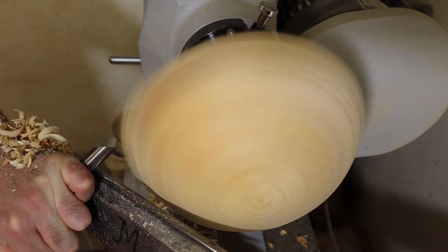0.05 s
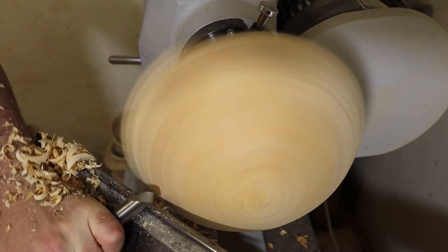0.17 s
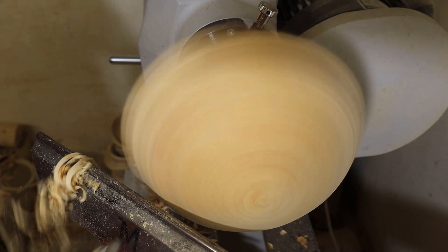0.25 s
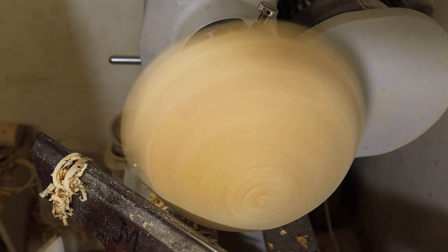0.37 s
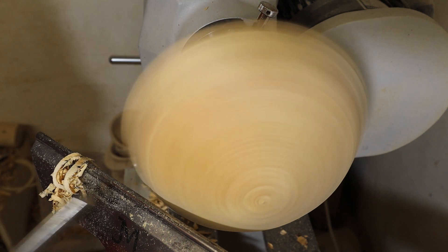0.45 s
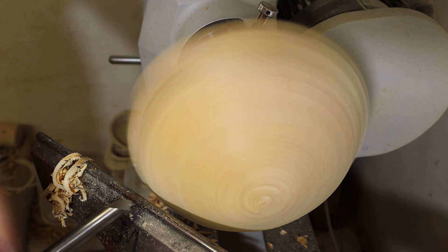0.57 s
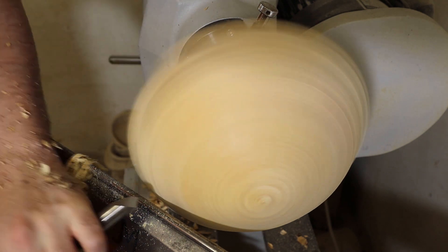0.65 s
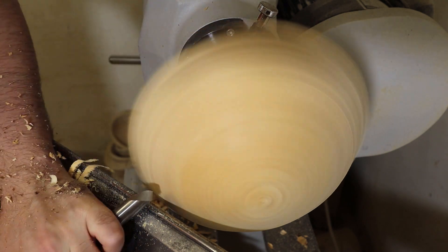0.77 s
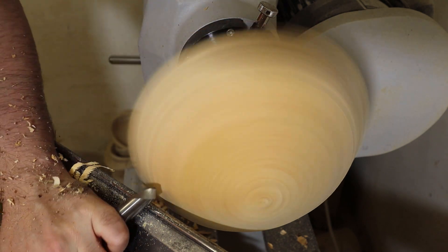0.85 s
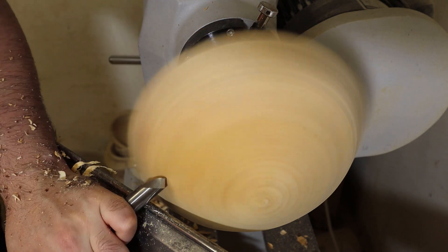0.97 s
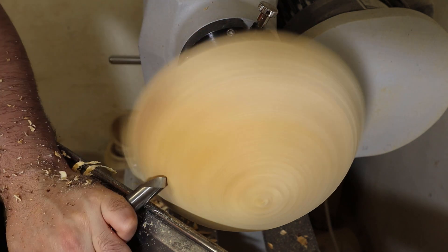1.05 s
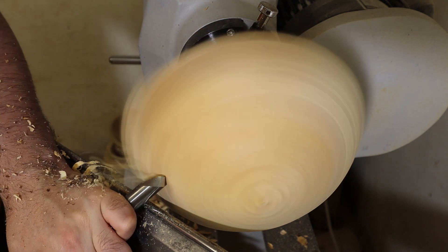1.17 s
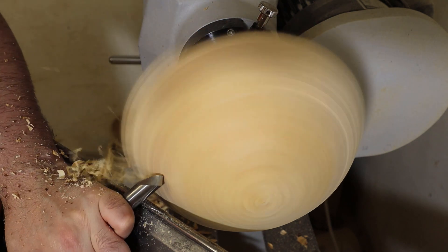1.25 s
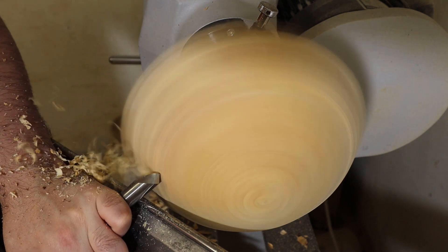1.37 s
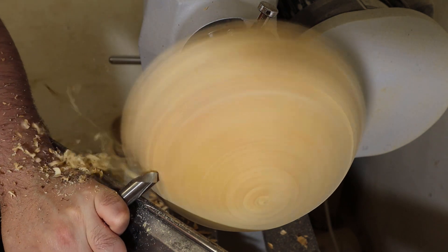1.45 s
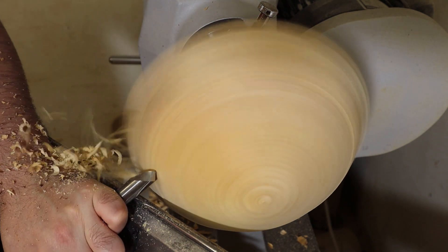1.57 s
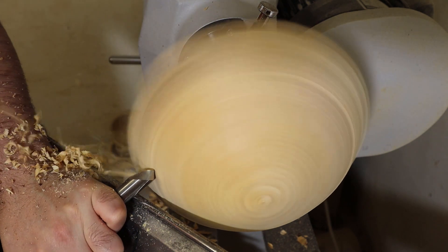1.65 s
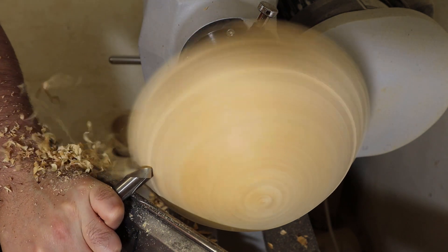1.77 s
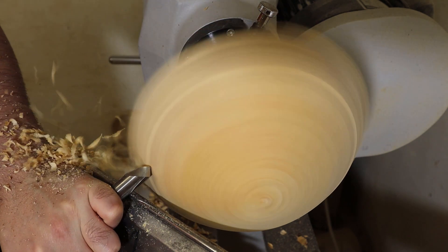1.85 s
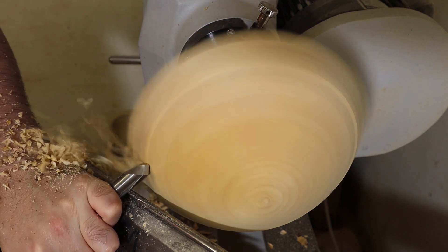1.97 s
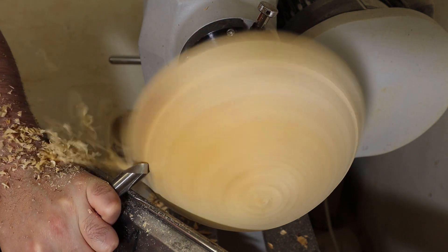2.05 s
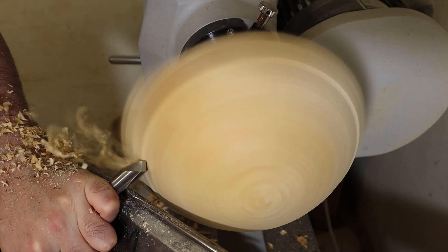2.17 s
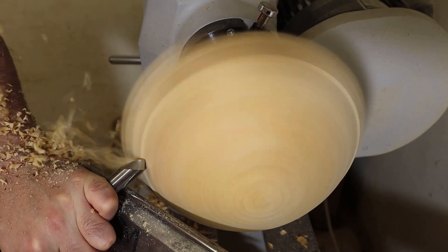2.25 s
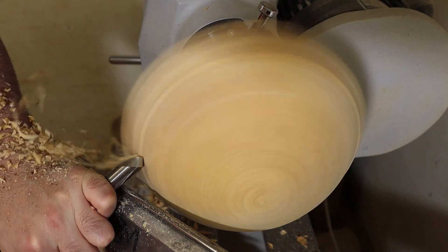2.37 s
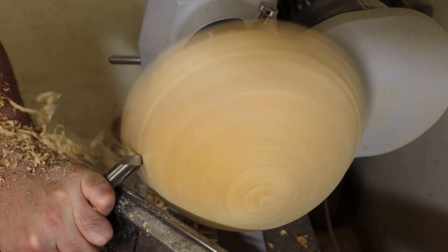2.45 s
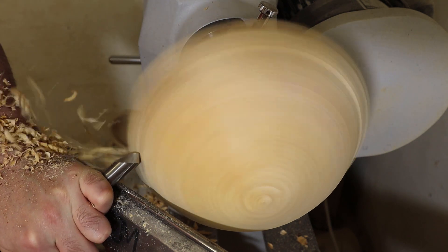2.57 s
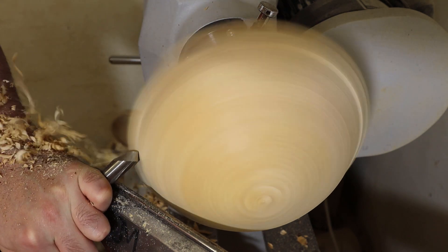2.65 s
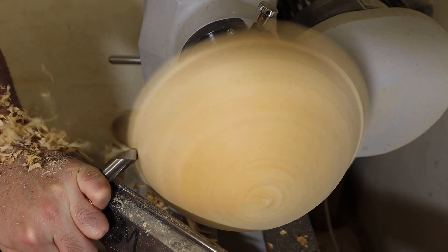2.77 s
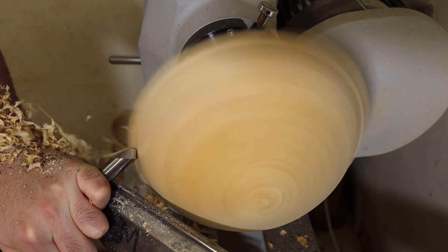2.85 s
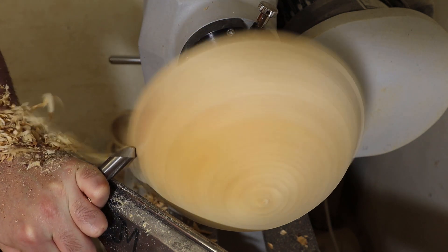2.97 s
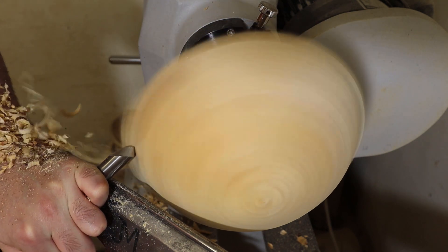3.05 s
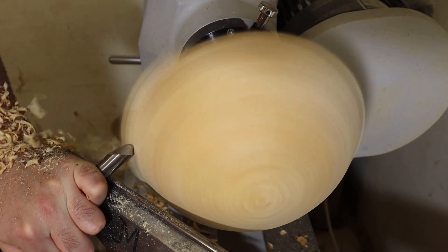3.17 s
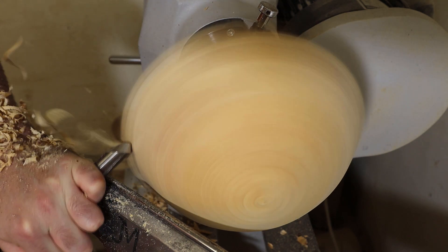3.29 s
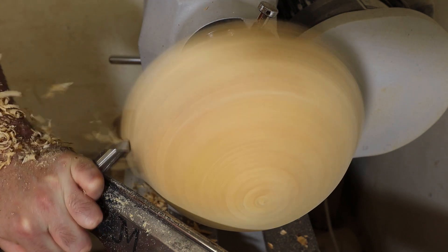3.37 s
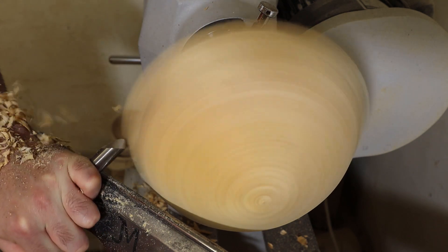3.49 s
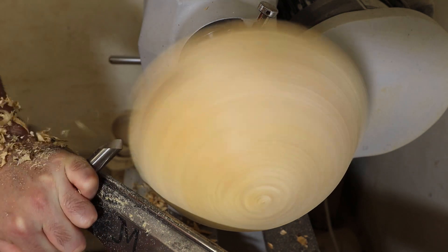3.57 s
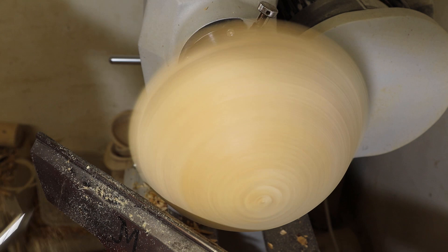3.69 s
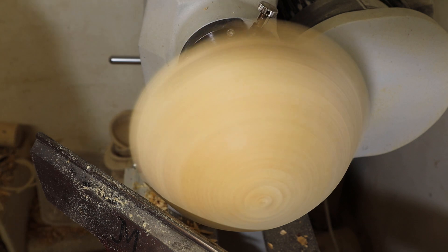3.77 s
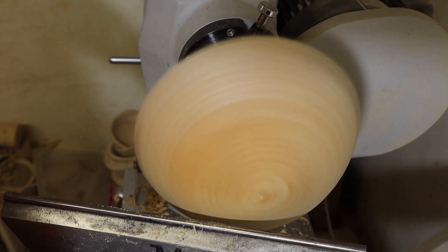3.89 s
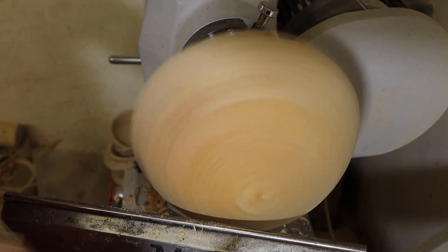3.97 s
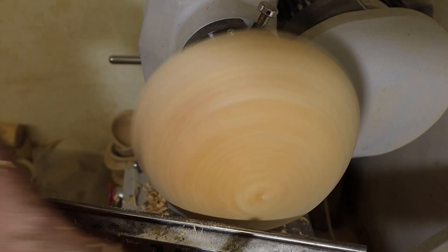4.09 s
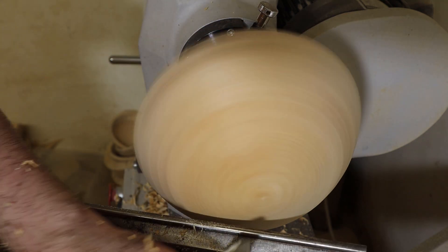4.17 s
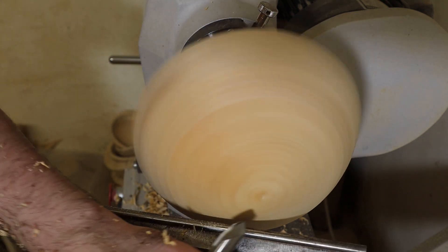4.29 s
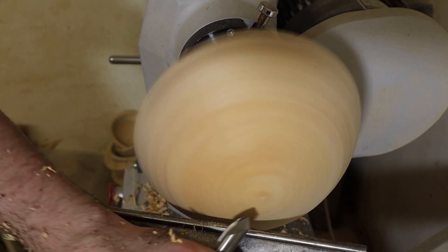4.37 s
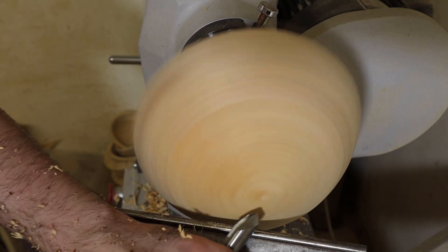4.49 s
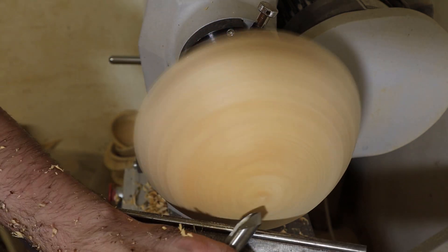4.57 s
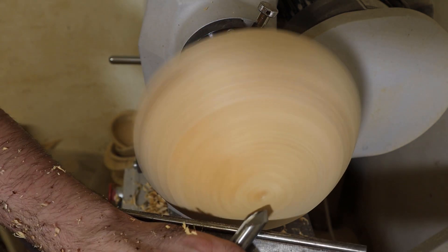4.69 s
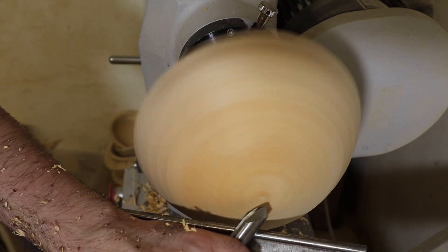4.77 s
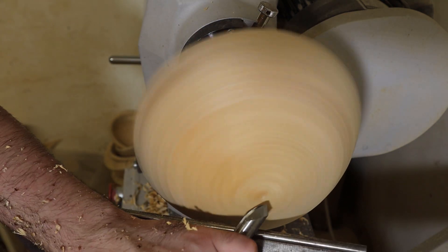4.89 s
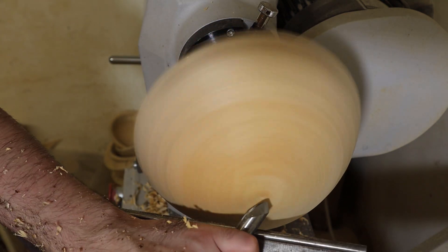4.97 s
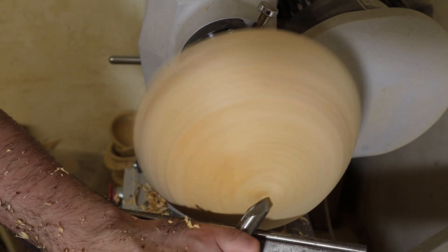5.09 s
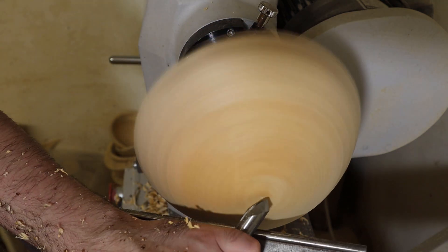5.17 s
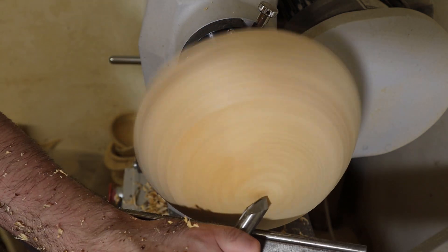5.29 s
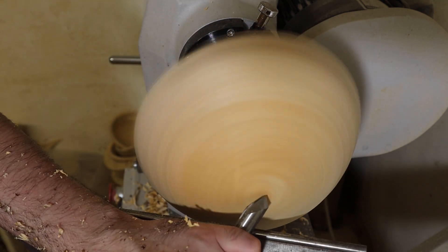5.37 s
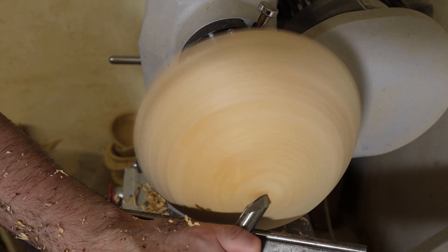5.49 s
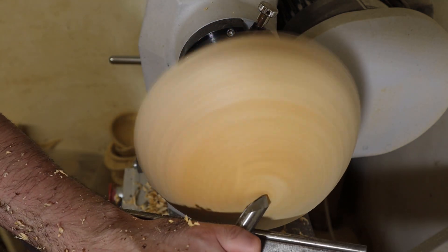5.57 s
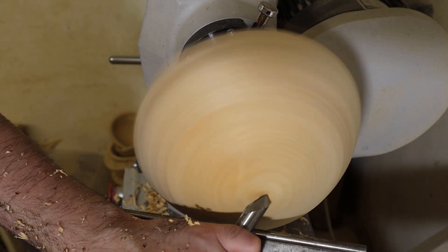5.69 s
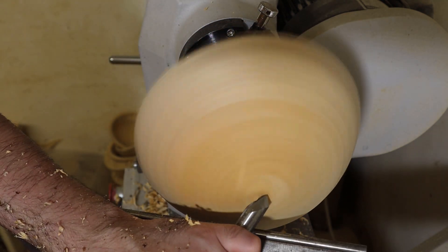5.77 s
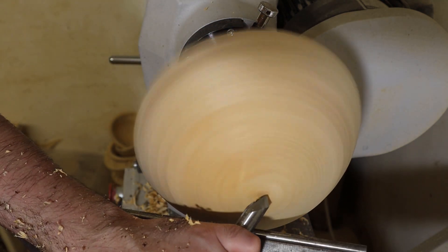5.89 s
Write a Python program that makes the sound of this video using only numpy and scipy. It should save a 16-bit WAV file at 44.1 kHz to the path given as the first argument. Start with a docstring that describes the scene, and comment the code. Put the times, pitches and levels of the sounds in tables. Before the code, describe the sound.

A wood lathe hums in a small workshop, and a gouge flicks off the spinning wood. After a second it cuts in with a chattering hiss, crackling fibres, thin squeaks and hollow drumming, ending in a quick run of sharp bites. The sound then shifts to a low motor rumble running up under a faint high whistle. The gouge knocks on the iron rest, rattles lightly and barely grazes the wood, all heard close.

```python
"""A gouge chatters into a lopsided wooden blank on a humming lathe in a small workshop.
It peels for two seconds: fibres snap and ring the steel, ridges crack, the bevel squeaks, the blank
drums. It runs off the rim, biting once a turn. Then, from a second position, the motor runs up under
the whistle of its speed drive; the gouge is set on the iron tool rest, rattles and grazes the wood."""
import sys
import numpy as np
from scipy import signal
from scipy.fft import rfft, irfft, next_fast_len
from scipy.io import wavfile
from scipy.ndimage import uniform_filter1d

SR = 44100
rng = np.random.default_rng(int(sys.argv[2]) if len(sys.argv) > 2 else 0)


def inscribe(sig):
    """Save sig as 16-bit PCM at rate SR to the path in sys.argv[1].

    A 1-D sig is mono; a 2-D sig holds one channel per row.
    Samples are clipped to [-1, 1] before scaling.
    """
    pcm = np.round(np.clip(np.atleast_2d(sig).T, -1, 1) * 32767)
    wavfile.write(sys.argv[1], SR, pcm.astype(np.int16))


N = 261954
TIME_S = np.arange(N) / SR
FFT_SIZE = next_fast_len(N + SR // 2, real=True) // 2 * 2
FREQ_HZ = np.maximum(np.arange(FFT_SIZE // 2 + 1) * SR / FFT_SIZE, 1)
LEFT_RIGHT = np.array([[1], [-1]])

TURN_HZ, BELT_HZ, LOBES = 24, 8, 4
CUT_START_S, CUT_END_S, CUT_FADE_S = 1.1077, 3.386, 0.00731
SECOND_POSITION_S, FULL_SPEED_S = 3.885, 4.39

# depth of the steady cut: time_s, hiss_db, drone_db
CUT_DEPTH = [(1.14, -49, -85.5), (1.17, -48, -65), (1.44, -40, -47.5), (1.55, -42, -54.5), (2.29, -37, -63),
             (2.84, -37, -57), (2.88, -40.5, -63.5), (3.07, -38, -57), (3.09, -39.5, -61),
             (3.34, -39, -59.5), (3.36, -39.5, -57)]
# blank's lag as the belt creeps under load: time_s, lag_turns
BELT_SLIP = [(1.7, 0.017), (2.05, -0.018), (2.35, .03), (2.7, 0.072), (3.05, 0.034), (3.35, 0.064)]
# tearing fibres: freq_hz, gain_db
FIBRE_COLOUR = [(150, -63), (600, -17.5), (1500, -14), (3000, -11), (3700, -1), (5500, -4), (6700, 2.5),
                (8300, -2.5), (10500, 0), (12000, 2), (15500, 1)]
# steel gouge resonances: centre_hz, width_hz, gain_db
GOUGE_MODES = [(2520, 37, 8.5), (2744, 75, 10), (3140, 380, -2), (3734, 130, 7), (4280, 270, 7.5),
               (4400, 67, -4), (4710, 160, 6), (5080, 220.7, 4), (7500, 250, 7), (9100, 160, 4),
               (9687, 130, -6), (10600, 210, 4.5), (11350, 170, 0)]
# hard ridges: start_s, end_s, angle_turns, decay_turns, over_cut_db
RIDGES = [(1.29, 1.7, 0.55, .035, 6.5), (1.288, 1.998, .29, 0.074, 3), (2.006, 2.817, 0.288, 0.075, 5.5),
          (2.82, 3.365, 0.33, 0.026, 5.5), (1.402, 1.977, 0.764, 0.091, 4.5), (1.986, 2.75, 0.75, 0.13, 4)]
# cracking ridge: freq_hz, gain_db
RIDGE_COLOUR = [(800, -22), (1400, -15.5), (2000, -20), (2700, -18), (3200, -25), (4300, -1), (5600, -17),
                (7500, -12), (9100, 5.5), (9700, 7.5), (10450, 10), (11800, 2), (13000, 2.5), (15500, 1)]
# stick-slip modes:
# pitch_hz, width_hz, wander_hz, level_db, loudest_s, halving_s, lobe_turns, swing_db, uneven_db
SQUEAKS = [(3795, 120, 14, -53.5, 1.94, 0.9, 0.22, -2, 1), (4197.5, 56, 11, -49.5, 2.09, 0.7, .215, 9, 1.5),
           (4288, 59, 29, -50, 2.42, 1.43, 0.19, 5, 3.5), (5110, 104, 52, -51.5, 2.6, 0.4, 0.15, 14, 5),
           (7430, 110, 22, -48.5, 1.13, -0.3, 0.945, 6, 5), (7410, 67, 48, -47.5, 2.32, 0.5, 0.956, 4.5, 4),
           (7430, 110, 50, -43, 3.25, 0.28, 0.18, 11, 4.5), (10660, 70, 280, -47.5, 2, 0.2, 0.32, 5, 1)]
# first touches, then bites near and off the rim: start_s, crack_db, tear_db, thump_db
BITES = [(1.066, -44.5, -53.5, -76), (1.087, -46.5, -61, -73), (3.297, -35, -43, -69),
         (3.359, -29, -58, -63), (3.3909, -27, -29, -51.5), (3.431, -25, -32, -52.5),
         (3.4733, -24, -33, -53.5), (3.5151, -23.5, -33, -50.5), (3.558, -22, -33, -49),
         (3.6, -29, -38, -51)]
# chip breaking off whole: freq_hz, gain_db
CHIP_COLOUR = [(150, -38), (700, -40.5), (2000, -26), (3100, -14), (4150, 0.5), (5600, -2.5), (7500, 5.5),
               (8400, -6), (10500, 7), (11900, 2), (12800, 6.5), (14000, 0.5), (15500, -1.5)]
# edge catching on a ridge: start_s, level_db
SNAGS = [(1.3036, -39.5), (1.511, -34), (1.636, -47), (1.761, -30), (1.801, -29), (2.009, -32),
         (2.221, -32), (2.24, -29), (2.348, -34), (2.7218, -30.5), (2.764, -35), (2.803, -39),
         (3.0137, -29.5), (3.0546, -32), (3.097, -33)]
# stereo tilt of the cut: freq_hz, left_over_right_db
EDGE_BALANCE = [(9600, 0), (10700, -3), (12500, 3.5), (15500, 2.5)]

# one side of the blank drumming harder: start_s, end_s, angle_turns, swing_db
DRONE_SWING = [(1.274, 1.755, 0.72, 7.5), (1.825, 3.199, 0.48, 2.5)]
# blank's body: freq_hz, gain_db
BLANK_COLOUR = [(30, -32), (110, -23.5), (190, -15.5), (290, -9.5), (400, -15.5), (600, -5), (930, 0),
                (1150, -4.5), (1500, -8), (2500, -0.5), (5000, -20.5)]
# blank's resonances: centre_hz, width_hz, gain_db
BLANK_MODES = [(462, 63, 10.5), (610, 23, 5.5), (824, 103, 13), (1200, 120, -6.5), (1358, 154, 15),
               (2030, 950, -1)]
# course of the end-grain knock: time_s, level_db, angle_turns
END_GRAIN = [(1.25, -61.5, .62), (1.36, -53.5, .62), (1.45, -47, .62), (1.56, -77, .61), (1.741, -47.5, .6),
             (1.841, -66, .48), (2.03, -55, .48), (2.3, -57.5, .46), (2.47, -55.5, .45), (2.78, -57.5, .47),
             (2.95, -55.5, .47), (3.03, -44, .46), (3.1, -57, .48), (3.35, -56, 0.5167),
             (3.44, -48.5, 0.5619), (3.6, -60, .55)]
# struck blank: pitch_hz, level_db, t60_s
END_GRAIN_MODES = [(475.79, -20.5, 0.081), (620, -9, 0.045), (793.7, 2.5, 0.081), (841, 0.5, 0.037),
                   (1030, -24, 0.038), (1140, -11.5, 0.07), (1450, -11, 0.026)]

# edge flicking the wood as it lifts off: start_s, level_db, decay_s
FLICKS = [(.0205, -22.5, 0.0025), (.027, -36.5, 0.012), (.062, -53, 0.0027)]
# flick spectrum: freq_hz, gain_db
FLICK_COLOUR = [(120, -27.5), (200, -25), (730, -3.5), (1210, -13), (1910, -15), (2700, -9), (3430, -14),
                (3690, -3.5), (5130, -7.5), (5630, -1), (6170, -10), (7270, 4), (8120, -8.5), (12800, 0),
                (16000, -15)]
# flick resonances: centre_hz, width_hz, gain_db
FLICK_MODES = [(5500, 370, 5), (7400, 378.3, 5)]
# shavings sliding off the hand: start_s, level_db, decay_s
SHAVINGS = [(.147, -66, .025), (.189, -62, 0.0065), (.352, -62.5, 0.0085), (.54, -67, 0.054),
            (.669, -63.5, .013)]
# their rustle: freq_hz, gain_db
SHAVING_COLOUR = [(500, -12), (2500, -0.5), (5000, 2), (9000, -1.5), (15000, -6)]
# gouge tapping the rest: start_s, level_db, decay_s
TAPS = [(.8485, -43, 0.0037), (.8525, -43.5, 0.005)]
# tap spectrum: freq_hz, gain_db
TAP_COLOUR = [(290, -45), (500, -16), (708, -32.5), (974, -14), (1210, -20.5), (1690, -12), (2260, -15),
              (2730, -4.5), (4400, -12), (6060, 0.5), (7530, -8), (9630, 4.5), (10700, -14), (14900, -8),
              (16000, -40)]
# gouge knocking on the rest: start_s, level_db, decay_s
REST_KNOCKS = [(3.94, -68.5, 0.025), (4.7315, -40, 0.0028), (4.7365, -43, 0.00361)]
# knock spectrum: freq_hz, gain_db
REST_COLOUR = [(350, -43), (600, -11), (703, -15), (915, -14), (990, -5), (1410, -11), (1530, 1),
               (1960, -2), (3120, -10), (4750, -9), (5400, -19), (7150, -16), (10200, -18.5), (14000, -43)]
# broad resonances of the rest: centre_hz, width_hz, gain_db
REST_PEAKS = [(1050.3, 250, 5), (2020, 290, 8), (2770, 430, 6.5), (3950, 1400, 8.5)]
# ringing iron: pitch_hz, level_db, t60_s
REST_MODES = [(996.4, -3, 0.24), (1111, -4.5, 0.25), (1965.1, 0, 0.13), (2214, -16.5, 0.11),
              (2330, -14, 0.57), (2490, -5, 0.214), (2800, -9, 0.2), (3750, -19, 0.34), (4100, -19.5, 0.25),
              (4686, -11, 0.11), (5458, -28, 0.15), (7936, -30.5, 0.33)]
# gouge rattling on the rest: freq_hz, gain_db
RATTLE_COLOUR = [(900, -27), (1290, 2), (1450, 15), (1560, -8), (1700, 6), (2050, -16), (2370, -11),
                 (2600, -24), (2850, -16), (4000, -38)]
# edge barely touching the wood: start_s, level_db, decay_s
GRAZES = [(5.235, -75, .02), (5.69, -72, .015), (5.732, -71, .014), (5.765, -71, .01), (5.793, -66, 0.015),
          (5.84, -70, .012), (5.893, -66.5, 0.015), (5.925, -75, .01)]
# graze spectrum: freq_hz, gain_db
GRAZE_COLOUR = [(800, -11), (1600, 3), (2500, -7), (3400, -1), (4500, -1), (5500, -10), (9000, -20),
                (14000, -40)]

# bearing noise, first position: freq_hz, gain_db
IDLE_COLOUR = [(24, -90), (40, -58), (99, -24.5), (209, -15.5), (290, -8), (412, -14.5), (444, -10.5),
               (630, -14), (715, -23), (965, -6), (1440, -17), (1720, -12.5), (2840, -24.5), (3830, -19.5),
               (16000, -36.5)]
# its resonances: centre_hz, width_hz, gain_db
IDLE_MODES = [(277.5, 18, 11), (950, 130, 2.5), (1220, 117.86, -13.5), (1810, 180, -1.5),
              (3895.3, 420, 5.5), (7100, 440, 6.5), (8300, 220, 6)]
# its stereo width: freq_hz, side_over_mid_db
IDLE_WIDTH = [(60, -9.5), (110, -19), (200, -21), (380, -16.5), (700, -7.5), (1290, -6), (2380, -4.5),
              (4400, -3), (8120, 3.5), (15000, 8)]
# motor, first position: pitch_hz, level_db
IDLE_TONES = [(301.5, -74.5), (463.0, -84.5), (613.7, -79.5), (877.5, -88), (925.9, -80), (952.8, -78.5),
              (985.1, -98), (1017, -90), (1082, -95), (1707, -74.5), (1846, -94.5), (3768, -83)]
# belt whirr: freq_hz, gain_db
BELT_COLOUR = [(600, -41.5), (780, -5.5), (870, -11), (950, -1.5), (1020, -8), (1120, -28), (1250, -33)]
# lathe rumble, second position: freq_hz, gain_db
RUMBLE_COLOUR = [(18, -49), (30, -32.5), (70, -2.5), (172, -14), (328, -7.5), (424, -17.5), (691, -15),
                 (806, -28), (1280, -23), (2140, -29), (2370, -30), (2560, -28.5), (7950, -49),
                 (10000, -38), (14000, -75)]
# its resonances: centre_hz, width_hz, gain_db
RUMBLE_MODES = [(43.96, 26, -3), (90.72, 42, 4), (289.84, 46, 6.5), (413, 63, -3.5), (644, 120, 1.5),
                (820, 230, 5.5), (1288, 110, 11), (1474, 72, 9.5), (1710, 100, 9), (2350, 87, 12.5),
                (2830, 70.3, 11.5)]
# its stereo width: freq_hz, side_over_mid_db
RUMBLE_WIDTH = [(60, -36), (110, -18.5), (200, -21), (380, -12), (700, -6.5), (1290, -5), (2380, 0),
                (4400, 7), (8120, 14), (15000, 24)]
# motor at full speed, second position: pitch_hz, level_db, left_over_right_db
RUN_TONES = [(66, -82, 1), (83.3, -77, 0), (205, -76.5, 3.5), (276, -100, -1), (334.5, -62.5, -2.5),
             (660, -86.5, -20), (702, -65, 5.5), (729, -79, -1)]
# drive's switching whistle: pitch_hz, level_db
DRIVE_TONES = [(9496, -85.5), (9884, -74.5), (9959, -84.5), (10040, -86), (10115, -81), (10584, -101)]
# drive's hiss: freq_hz, gain_db
DRIVE_COLOUR = [(8000, -32.5), (9400, -26), (9950, -23.5), (10500, -22.5), (11500, -35.5), (14000, -51)]
# stereo width of the reflections: freq_hz, side_over_mid_db
ROOM_WIDTH = [(100, 5.5), (700, -8), (1400, -4), (3000, 1), (8000, -4), (15000, -37)]


def gouge():
    """A steady shaving, then one chip a turn, over the drumming of the blank."""
    _, hiss_db, drone_db = curve(CUT_DEPTH)
    breaks, thumps = bites()
    chips = through(breaks * fractures(spread_db=-0.5, apart=0.4), body(CHIP_COLOUR))
    edge = peeling(hiss_db) + chips * from_db(0.61 * LEFT_RIGHT) + snags()
    edge = through(edge, from_db(LEFT_RIGHT * spectrum_db(EDGE_BALANCE) / 2))
    edge = workshop(edge, lag_ms=0.027, near_db=-9.5, room_db=-11)
    blank = drumming(drone_db, thumps) + end_grain_knocks()
    return edge + workshop(blank, lag_ms=0.02, near_db=-10.5, room_db=-4)


def peeling(hiss_db):
    """Fibres snap at the edge and ring the steel; ridges crack and the bevel squeaks over them."""
    pressure = edge_pressure()
    force = pressure * from_db(hiss_db + 1.8)
    # coarse grain repeats from turn to turn; the finest tearing is always new
    coarse_band = np.sqrt(lowpass(5500, 8))
    grain = each_turn(grains(spread_db=2.5), memory=0.54)
    grain = grain + from_db(-3.5) * fractures(spread_db=1, apart=0.93)
    coarse = through(force * from_db(-4 + 2.46 * drift(110)) * grain, coarse_band)
    fine = through(force * fractures(spread_db=5, apart=0.24), np.sqrt(1 - coarse_band ** 2))
    fibres = through(coarse + fine, body(FIBRE_COLOUR, GOUGE_MODES))
    bevel_pressure = pressure * from_db(0.2302 * (hiss_db - hiss_db.max()))
    return fibres + ridge_cracks(hiss_db) + squeaks(bevel_pressure)


def edge_pressure(shallow_s=0.2, entry_s=0.04687, hollow_growth_s=0.066):
    """Uneven grain, lobes, wobble and a hollow vary the load as the edge eases in and cuts."""
    since_s = np.maximum(TIME_S - CUT_START_S, 0)
    remaining_s = np.maximum(CUT_END_S - TIME_S, 0)
    grain_db = 0.85 * each_turn(drift(200), memory=0.91) + 1.2 * drift(100)
    # the bevel rides the lobes, fluttering most where the cut is shallow
    shallow = np.exp(-since_s / shallow_s) + np.exp(-remaining_s / shallow_s)
    flutter_db = (2 + 2 * shallow) * turn_wave(0.15, per_turn=LOBES)
    wobble_db = 0.55 * turn_wave(0.25)   # the off-centre blank leans into the edge
    # the hollow drops away once a turn, deeper towards the rim
    hollow = passing(angle_turns=-0.05, width_turns=0.096)
    hollow_db = -18 * np.exp(-remaining_s / hollow_growth_s) * hollow
    entry = between(CUT_START_S, CUT_END_S, CUT_FADE_S) * from_db(-5.5 * np.exp(-since_s / entry_s))
    return entry * evened(from_db(grain_db + flutter_db + wobble_db + hollow_db))


def ridge_cracks(hiss_db, rise_turns=0.024):
    """Each ridge hits the edge suddenly and crumbles behind it, with a new strength every turn."""
    hits, turns = np.zeros(N), blank_turns()
    for start_s, end_s, angle_turns, decay_turns, over_cut_db in RIDGES:
        past_turns = (turns - angle_turns + 0.251) % 1 - 0.25
        rise = np.exp(-0.5 * (np.minimum(past_turns, 0) / rise_turns) ** 2)
        crumble = np.exp(-np.maximum(past_turns, 0) / decay_turns)
        hits += from_db(over_cut_db) * between(start_s, end_s, 0.05) * rise * crumble
    force = hits * from_db(hiss_db + 2.5 * drift(48))
    return through(force * fractures(spread_db=6.5, apart=0.79), body(RIDGE_COLOUR))


def squeaks(pressure):
    """The rubbing bevel sets wandering modes singing, in short flares as the lobes pass."""
    out = np.zeros(N)
    for hz, width_hz, wander_hz, db, loudest_s, halving_s, lobe_turns, swing_db, uneven_db in SQUEAKS:
        lobes_db = swing_db * turn_wave(lobe_turns, per_turn=LOBES)
        lobes_db += uneven_db * (0.44 * turn_wave(lobe_turns) + turn_wave(lobe_turns, per_turn=2))
        # the bevel either sticks or slips, so flares have a ceiling
        slip_db = 6.1 * np.tanh(each_turn(drift(260), memory=0.46) - 0.4)
        flare = evened(from_db(slip_db + lobes_db))
        # each mode swells and fades as the gouge swings round
        swell = from_db(db) * 0.5 ** (((TIME_S - loudest_s) / halving_s) ** 2)
        rub = pressure * swell * flare * each_turn(rng.standard_normal(N), memory=0.26)
        pitch_hz = hz + wander_hz * each_turn(drift(70), memory=0.6056)
        out += resonator(rub, pitch_hz, width_hz)
    return out


def bites(tear_after_s=0.009):
    """Break and thump envelopes: each bite cracks, then its chip tears free; both push the blank."""
    cracks = bursts([(s, db, 0.004) for s, db, _, _ in BITES], rise_s=0.0024)
    tears = bursts([(s + tear_after_s, db, 0.0046) for s, _, db, _ in BITES], rise_s=0.0043)
    pushes = [(s + delay_s, db, 0.0071) for s, _, _, db in BITES for delay_s in (0, tear_after_s)]
    return cracks + tears, bursts(pushes, rise_s=0.0043)


def snags(ping_hz=10400):
    """The edge catches on a ridge: a crack and a short ping of the steel."""
    catches = bursts([(s, db, 0.0036) for s, db in SNAGS], rise_s=0.00098)
    ping = tone(ping_hz, waver_db=-4, wander_hz=50.1)
    crack = from_db(-0.5) * through(grains(spread_db=4), body(CHIP_COLOUR))
    return catches * (ping + crack)


def drumming(drone_db, thumps, thud_start_s=1.25, growth_db_per_s=5):
    """The cutting force drums on the blank: a hollow drone over a deeper thud."""
    swing_db = sum(db * between(start_s, end_s, 0.1167) * turn_wave(angle_turns)
                   for start_s, end_s, angle_turns, db in DRONE_SWING)
    force = between(CUT_START_S, CUT_END_S, CUT_FADE_S) * evened(from_db(swing_db))
    drone = force * from_db(drone_db - 0.2) + thumps
    # the thud grows towards the rim and partly follows the drone
    thud_db = -59.5 + growth_db_per_s * (TIME_S - thud_start_s) + 0.71 * (drone_db - np.median(drone_db))
    thud = force * between(thud_start_s, CUT_END_S, 0.1) * from_db(thud_db) + from_db(4) * thumps
    grain = each_turn(grains(spread_db=2.5), memory=0.63)
    blank = body(BLANK_COLOUR, BLANK_MODES)
    deep = lowpass(560, 6)
    return (through(drone * grain, blank * (1 - deep))
            + through(thud * grain, blank * deep * highpass(110, 4)))


def end_grain_knocks(rise_s=0.0023):
    """Once a turn the end grain strikes the edge; the blank rings like a wood block."""
    time_s, level_db, angle_turns = np.transpose(END_GRAIN)
    out, age_s = np.zeros(N), TIME_S[:SR // 6]
    attack = np.minimum(age_s / rise_s, 1)
    for turn in np.arange(np.ceil(time_s[0] * TURN_HZ), time_s[-1] * TURN_HZ):
        strike_turns = np.interp(turn / TURN_HZ, time_s, angle_turns) + rng.normal(0, 0.012)
        start_s = (turn + strike_turns) / TURN_HZ
        modes = [(hz, db + rng.normal(0, 2), t60_s) for hz, db, t60_s in END_GRAIN_MODES]
        strength = from_db(np.interp(start_s, time_s, level_db))
        out[int(start_s * SR):][:len(age_s)] += strength * attack * ringing(modes, age_s)
    return out


def handling():
    """The edge flicks off the wood, shavings slide off the hand, the gouge taps the rest."""
    flick = bursts(FLICKS, rise_s=0.00074) * fractures(spread_db=1.5, apart=0.2)
    tap = bursts(TAPS, rise_s=0.00065) * fractures(spread_db=-2, apart=0.5365)
    rustle = bursts(SHAVINGS, rise_s=0.0057) * fractures(spread_db=8, apart=0.48)
    return (through(flick, body(FLICK_COLOUR, FLICK_MODES))
            + through(tap, body(TAP_COLOUR))
            + through(rustle, body(SHAVING_COLOUR)))


def rest_knocks():
    """The gouge knocks on the iron rest; the second knock sets it ringing."""
    knocks = bursts(REST_KNOCKS, rise_s=0.00034) * fractures(spread_db=-4, apart=0.53)
    age_s = np.maximum(TIME_S - REST_KNOCKS[1][0], 0)
    return through(knocks, body(REST_COLOUR, REST_PEAKS)) + from_db(-58.5) * ringing(REST_MODES, age_s)


def rattle(start_s=4.93):
    """The gouge rattles lightly on the rest, shaken twice a turn."""
    shake_db = 10 * turn_wave(0.062, per_turn=2) - 2 * np.tanh(drift(45))
    shake = from_db(-78.5) * between(start_s, 7, 0.2) * unit_rms(from_db(shake_db))
    return through(shake * fractures(spread_db=4, apart=0.45), body(RATTLE_COLOUR))


def grazes():
    """The edge barely touches the spinning wood."""
    touches = bursts(GRAZES, rise_s=0.006) * fractures(spread_db=-3, apart=0.65)
    return through(touches, body(GRAZE_COLOUR))


def idle_lathe(joint_s=0.1113):
    """Bearing noise, plus a belt whirr and motor tones that pulse with each lap of the belt."""
    lap = np.cos(2 * np.pi * (TIME_S - joint_s) * BELT_HZ)
    noise = bearings() + belt_whirr(lap, joint_s)
    motor = sum(tone(hz, waver_db=0.1, wander_hz=1.24) * from_db(db - 2.5) for hz, db in IDLE_TONES)
    return noise + from_db(0.55 * lap) * motor


def bearings(throb_dip_s=0.091):
    """Bearing noise repeats with the spindle; its low hum throbs twice a belt lap."""
    colour = body(IDLE_COLOUR, IDLE_MODES)
    mid = through(each_turn(grains(spread_db=-2.5), memory=0.59), colour)
    side = through(each_turn(grains(spread_db=-6.5), memory=0.4), colour)
    throb = unit_rms(from_db(-np.cos(4 * np.pi * (TIME_S - throb_dip_s) * BELT_HZ)))
    mid = mid + (throb - 1) * through(mid, lowpass(421.6, 8))
    return from_db(-68) * widen(mid, side, IDLE_WIDTH)


def belt_whirr(lap, joint_s):
    """The whirr throbs twice a lap, flutters twice a turn and dips slightly as the joint passes."""
    throb_db = 2 * (2 * lap ** 2 - 1)
    flutter_db = 3 * turn_wave(joint_s * TURN_HZ, per_turn=2)
    joint_db = -0.5 * np.exp(3.1 * (lap - 1))
    whirr = through(each_turn(grains(spread_db=-3), memory=0.93), body(BELT_COLOUR))
    return from_db(-71.5 + throb_db + flutter_db + joint_db) * whirr


def motor_run_up(ramp_per_s=0.88, growth_db_per_s=1.6):
    """Rumble grows and motor tones rise as the speed ramps up."""
    speed = np.clip(1 + ramp_per_s * (TIME_S - FULL_SPEED_S), 0.1, 1)
    shaking = rng.standard_normal((2, N)) * from_db(1.7 * drift(40))
    mid, side = through(shaking, body(RUMBLE_COLOUR, RUMBLE_MODES) * np.sqrt(highpass(51.89, 8)))
    rumble = from_db(-64 + growth_db_per_s * (TIME_S - FULL_SPEED_S)) * widen(mid, side, RUMBLE_WIDTH)
    # the deepest shaking builds only near full speed
    rumble -= (1 - speed ** 3) * through(rumble, lowpass(85, 6))
    motor = sum(from_db(db + LEFT_RIGHT * pan_db / 2) * tone(hz * speed, waver_db=2.5, wander_hz=3.22)
                for hz, db, pan_db in RUN_TONES)
    return rumble + from_db(-2.5) * speed ** 4.526 * motor


def drive_whistle():
    """The speed drive whistles at its constant switching rate."""
    whistle = sum(from_db(db) * tone(hz, waver_db=0, wander_hz=1.4148) for hz, db in DRIVE_TONES)
    whistle = whistle + from_db(-80.5) * through(rng.standard_normal((2, N)), body(DRIVE_COLOUR))
    # so short a wave meets the two ears out of step
    return whistle + LEFT_RIGHT * through(whistle, 1j * from_db(3.5))


def workshop(x, lag_ms, near_db, room_db, near_t60_s=0.052, room_t60_s=0.21, wall_hz=3500):
    """Direct sound, left ear first, plus scatter off the lathe and a duller room tail."""
    near = from_db(near_db) * reflections(near_t60_s)
    tail = from_db(room_db) * reflections(room_t60_s) / (1 + 1j * FREQ_HZ / wall_hz)
    mid, side = near + tail
    direct = np.exp(1j * np.pi * FREQ_HZ * lag_ms / 1000 * LEFT_RIGHT)
    return through(x, direct + mid + LEFT_RIGHT * side * from_db(spectrum_db(ROOM_WIDTH)))


def reflections(t60_s):
    """Mid and side responses of a diffuse decay."""
    decay = rng.standard_normal((2, N)) * from_db(-60 * TIME_S / t60_s)
    return rfft(unit_rms(decay) / np.sqrt(N), FFT_SIZE)


def blank_turns():
    """Turns made so far, less belt slip."""
    _, lag_turns = curve(BELT_SLIP)
    return TIME_S * TURN_HZ - lag_turns


def turn_wave(angle_turns, per_turn=1):
    """Cosine locked to the blank, with a peak at this angle."""
    return np.cos(2 * np.pi * per_turn * (blank_turns() - angle_turns))


def passing(angle_turns, width_turns):
    """A bump each time one spot passes the edge."""
    away_turns = (blank_turns() - angle_turns + 0.5) % 1 - 0.5
    return np.exp(-0.5 * (away_turns / width_turns) ** 2)


def each_turn(x, memory):
    """What is met on one turn returns, partly renewed, on the next."""
    period = round(SR / TURN_HZ)
    turns = np.pad(x, (0, -N % period)).reshape(-1, period)
    fresh = np.sqrt(1 - memory ** 2)
    repeated, _ = signal.lfilter([fresh], [1, -memory], turns, axis=0, zi=memory * turns[-2:-1])
    return repeated.ravel()[:N]


def evened(gain):
    """Gain scaled to unit power over each turn."""
    return gain / np.sqrt(uniform_filter1d(gain ** 2, round(SR / TURN_HZ)))


def grains(spread_db):
    """Dense tiny impulses of uneven size."""
    return unit_rms(rng.standard_normal(N) * from_db(spread_db * np.minimum(drift(2500), 2)))


def fractures(spread_db, apart):
    """Grains at two ears; a share `apart` of the power comes by separate paths."""
    separate = np.array([grains(spread_db), grains(spread_db)])
    return np.sqrt(1 - apart) * grains(spread_db) + np.sqrt(apart) * separate


def bursts(contacts, rise_s):
    """Envelope of contacts that swell quickly and die away."""
    out = np.zeros(N)
    for start_s, level_db, decay_s in contacts:
        span = slice(int(start_s * SR), int(start_s * SR) + SR // 5)
        age_s = np.maximum(TIME_S[span] - start_s, 0)
        decay = np.exp(-np.maximum(age_s - rise_s, 0) / decay_s)
        out[span] += from_db(level_db) * np.minimum(age_s / rise_s, 1) * decay
    return out


def tone(hz, waver_db, wander_hz):
    """Sine wavering in level and pitch."""
    cycles = np.cumsum(hz + wander_hz * drift(12)) / SR + rng.random()
    return np.sqrt(2) * np.sin(2 * np.pi * cycles) * from_db(waver_db * drift(14))


def ringing(modes, age_s):
    """Decaying sines of a struck body."""
    return sum(from_db(db - 60 * age_s / t60_s) * np.sin(2 * np.pi * hz * age_s)
               for hz, db, t60_s in modes)


def resonator(x, pitch_hz, width_hz):
    """One driven mode of moving pitch."""
    carrier = np.exp(2j * np.pi * np.cumsum(pitch_hz) / SR)
    pole = np.exp(-np.pi * width_hz / SR)
    baseband = signal.lfilter([1], [1, -pole], x / carrier + 1e-18)
    return np.real(carrier * baseband) * np.sqrt(2 * (1 - pole ** 2))


def body(colour, modes=()):
    """Minimum-phase response of unit power: broad colour plus resonances."""
    peaks_db = sum(db / (1 + (2 * (FREQ_HZ - hz) / width_hz) ** 2) for hz, width_hz, db in modes)
    cepstrum = irfft(np.log(unit_rms(from_db(spectrum_db(colour) + peaks_db))))
    cepstrum[1:FFT_SIZE // 2] *= 2
    cepstrum[FFT_SIZE // 2 + 1:] = 0
    return np.exp(rfft(cepstrum))


def widen(mid, side, width):
    """Left and right from mid and side."""
    return mid + LEFT_RIGHT * through(side, from_db(spectrum_db(width)))


def through(x, response):
    """Filter by a frequency response."""
    return irfft(rfft(x, FFT_SIZE) * response, FFT_SIZE)[..., :N]


def lowpass(corner_hz, order):
    """Zero-phase treble roll-off."""
    return 1 / (1 + (FREQ_HZ / corner_hz) ** order)


def highpass(corner_hz, order):
    """Zero-phase bass roll-off."""
    return 1 / (1 + (corner_hz / FREQ_HZ) ** order)


def spectrum_db(points):
    """Points joined over log frequency."""
    hz, db = np.transpose(points)
    return np.interp(np.log(FREQ_HZ), np.log(hz), db)


def curve(rows):
    """Every column of a timed table, per sample."""
    columns = np.transpose(rows)
    return [np.interp(TIME_S, columns[0], column) for column in columns]


def between(start_s, end_s, fade_s):
    """Gate with sloping edges."""
    return np.clip(np.minimum(TIME_S - start_s, end_s - TIME_S) / fade_s + 0.5, 0, 1)


def drift(rate_hz):
    """Random wander, spread about one."""
    knots = rng.standard_normal(int(N / SR * rate_hz) + 2)
    return np.interp(TIME_S * rate_hz, np.arange(len(knots)), knots)


def unit_rms(x):
    """Scale to unit power."""
    return x / np.sqrt(np.mean(x ** 2) + 1e-20)


def from_db(db):
    """Decibels to gain."""
    return 10 ** (np.asarray(db) / 20)


def scene():
    """The cut and the tool noises over the lathe, from one position and then the other."""
    cut = gouge()
    handled, knocks, light_touches = handling(), rest_knocks(), rattle() + grazes()
    tool = (workshop(handled, lag_ms=0.026, near_db=-11, room_db=-9)
            + workshop(knocks, lag_ms=0.072, near_db=-2, room_db=-0.5)
            + workshop(light_touches, lag_ms=0.11, near_db=-5, room_db=-5))
    second = between(SECOND_POSITION_S, 7, 0.01036)
    return cut + tool + (1 - second) * idle_lathe() + second * (motor_run_up() + drive_whistle())


def record(dry):
    """Steep low-pass at 15.9 kHz."""
    return signal.sosfilt(signal.ellip(12, 0.2, 80, 15900, fs=SR, output="sos"), dry)


dry = scene()
out = record(dry)
inscribe(out)
```